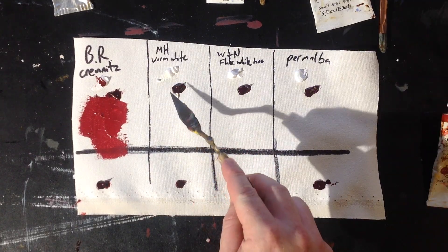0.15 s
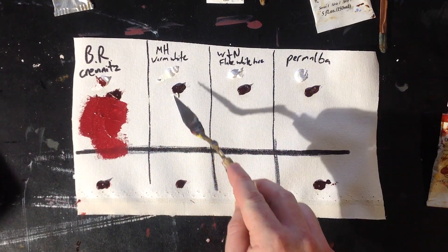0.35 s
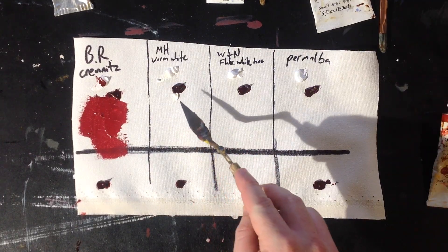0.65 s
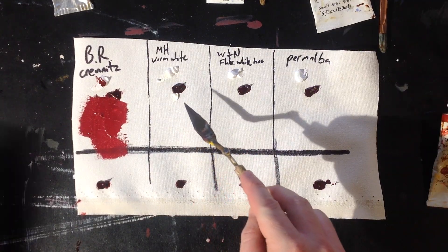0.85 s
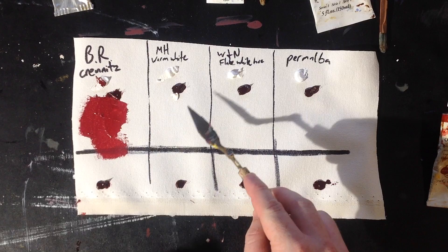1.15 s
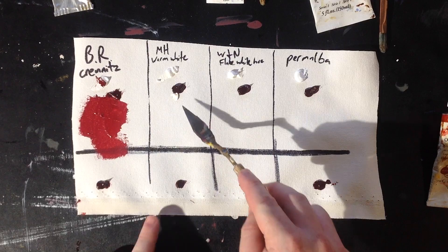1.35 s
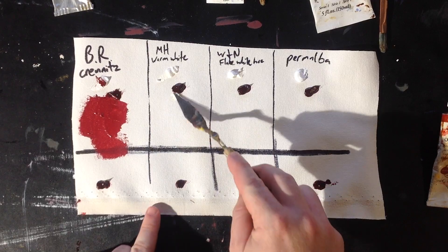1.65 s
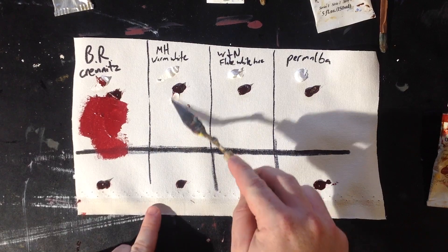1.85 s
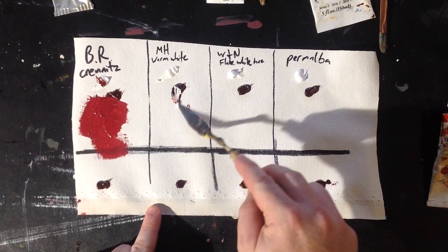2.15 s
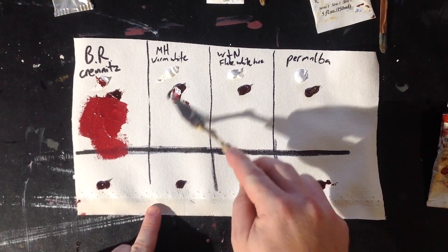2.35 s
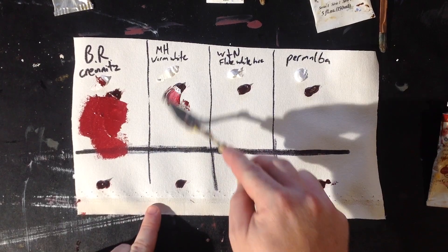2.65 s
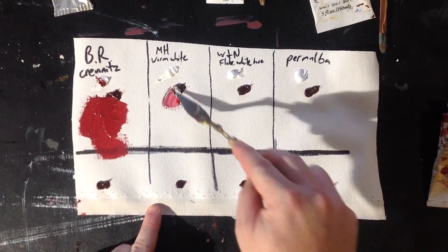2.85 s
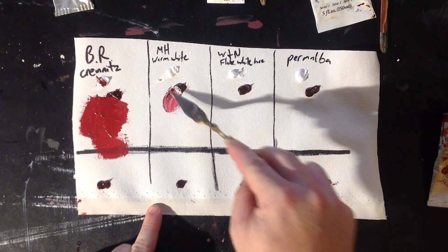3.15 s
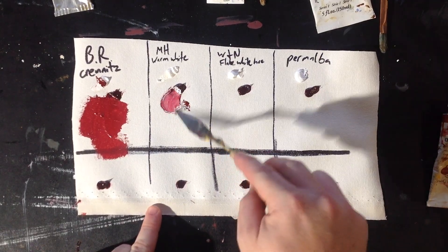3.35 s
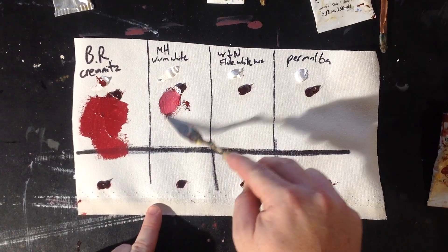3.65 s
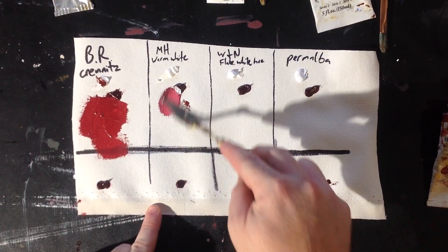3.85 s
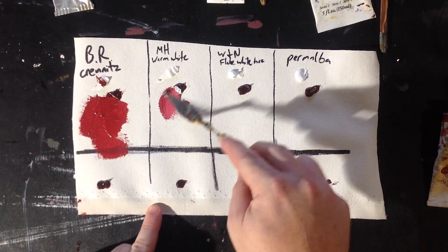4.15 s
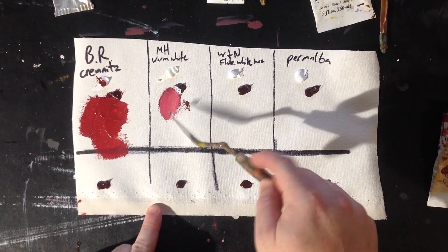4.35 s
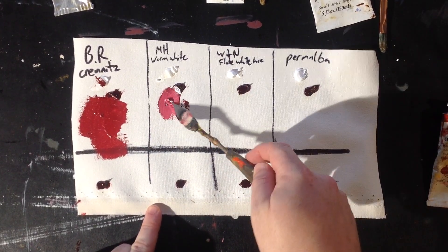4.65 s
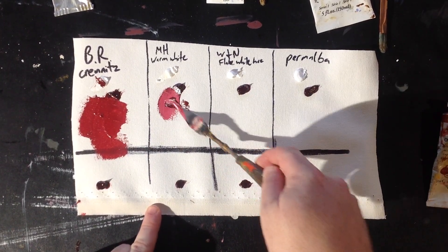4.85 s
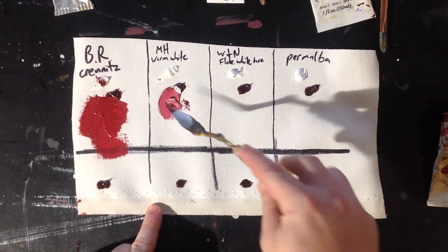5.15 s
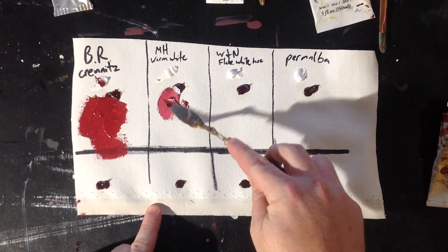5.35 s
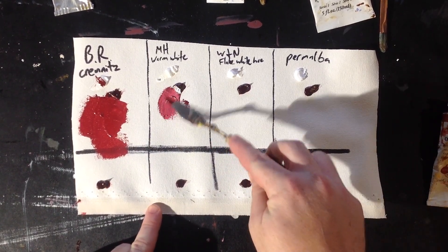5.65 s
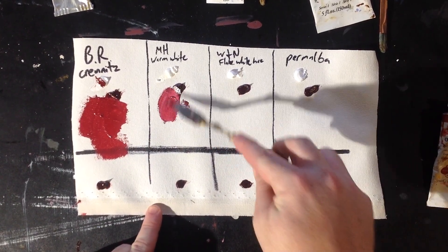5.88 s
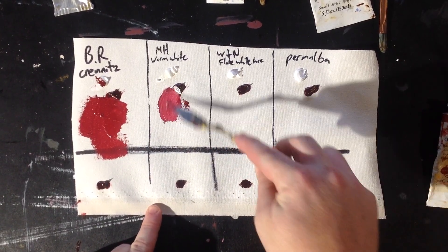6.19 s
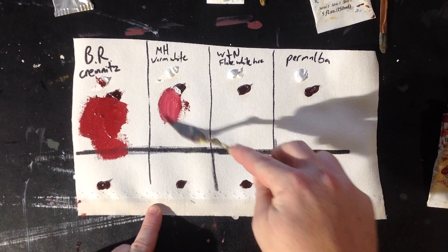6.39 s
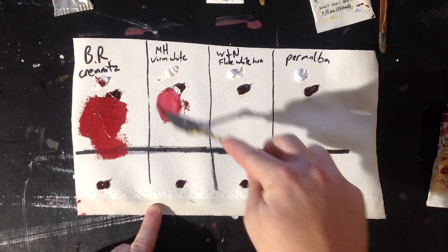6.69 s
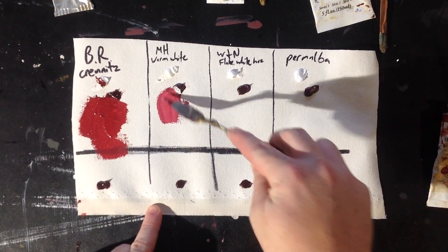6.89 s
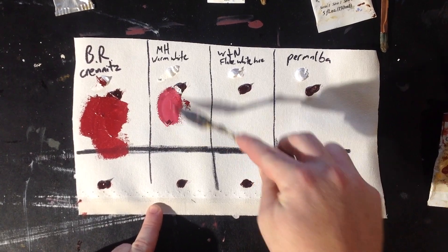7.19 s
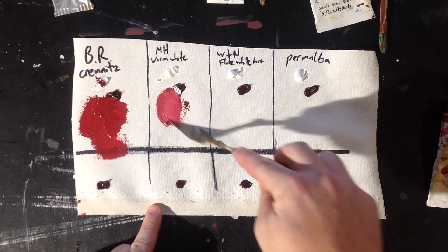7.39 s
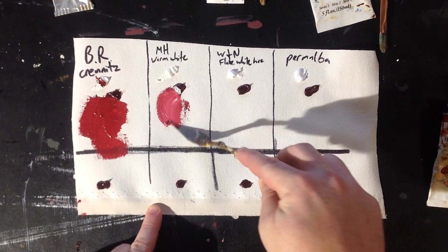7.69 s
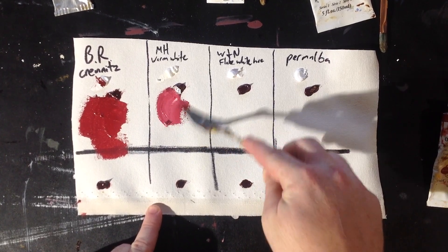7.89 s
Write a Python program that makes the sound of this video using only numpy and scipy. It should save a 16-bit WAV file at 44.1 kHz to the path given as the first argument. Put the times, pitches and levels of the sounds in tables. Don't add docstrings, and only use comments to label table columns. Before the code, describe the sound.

Close, dry scrapes and light ticks of a flexible metal blade rubbing paint into woven canvas, quickening, in a quiet room with low humming.

```python
import sys
import numpy as np
from scipy import signal
from scipy.io import wavfile
from scipy.ndimage import uniform_filter1d

SR = 44100
rng = np.random.default_rng(int(sys.argv[2]) if len(sys.argv) > 2 else 0)


def to_linear_factor(level_db):
    exponent = np.asarray(level_db, float) / 20
    return 10 ** exponent


def wrap_up_sound(samples):
    columns = np.atleast_2d(samples).T
    tamed = np.clip(columns, -1, 1)
    steps = np.round(tamed * 32767).astype(np.int16)
    wavfile.write(sys.argv[1], SR, steps)


N = 353902


def evened(x):
    return x / np.sqrt(np.mean(x ** 2) + 1e-20)


def read(points, hz):
    f, value = np.transpose(points)
    return np.interp(np.log(hz + 1), np.log(f + 1), value)


def track(rows):
    s, *columns = np.transpose(rows)
    return [np.interp(np.arange(N) / SR, s, c) for c in columns]


def add(mix, s, sound):
    part = mix[max(round(s * SR), 0):][:len(sound)]
    part += sound[:len(part)]


def drift(seconds):
    size = max(round(seconds * SR), 1)
    once = uniform_filter1d(rng.standard_normal(N), size)
    return evened(uniform_filter1d(once, size))


def resonate(x, hz, width):
    pole = np.exp((2j * np.pi * min(hz, SR / 2.2) - np.pi * width) / SR)
    gain, feedback = [1 - abs(pole)], [1, -pole]
    once = signal.lfilter(gain, feedback, x)
    return 2 * signal.lfilter(gain, feedback, once).real


def body(x, modes, sway_db=0):
    out = np.zeros(len(x))
    for k, (hz, width, db) in enumerate(modes):
        sway = sway_db * drift(0.011) if sway_db else 0
        ring = resonate(x, hz, width) / np.sqrt(width)
        out += (-1) ** k * to_linear_factor(db + sway) * ring
    return evened(out)


def tone(hz, rows, waver_hz, waver_db):
    turns = np.cumsum(hz + waver_hz * drift(0.04)) / SR
    level = to_linear_factor(track(rows)[0] + waver_db * drift(0.027))
    return np.sqrt(2) * level * np.sin(2 * np.pi * turns)


# (pitch [Hz], level [dB per Hz])
AIR_COLOUR = [(30, -32), (70, -21), (110, -3), (200, 3.5), (350, -0.5), (500, -6.5), (1050, -9.5),
              (1500, -15.5), (2300, -15.5), (3500, -17.5), (8000, -18), (12000, -19), (15300, -18.5)]


def air():
    frames, hz = N // 256 + 5, np.fft.rfftfreq(1024, 1 / SR)
    a, b, patches = rng.standard_normal((frames, 513, 3)).T
    patches = uniform_filter1d(patches, size=6, axis=0)
    patches = evened(uniform_filter1d(patches, size=40, axis=1))
    patchy_db = read([(300, 1.2), (1500, 1.5), (3000, .5)], hz)[:, None]
    z = (a + 1j * b) * to_linear_factor(read(AIR_COLOUR, hz)[:, None] + patchy_db * patches)
    noise = signal.istft(z, nperseg=1024, noverlap=768)[1][:N]
    return to_linear_factor(-61) * evened(noise)


# (pitch [Hz], width [Hz], level [dB])
FAN_NOTES = [(146.1, 4.6, -72.5), (204.4, 20, -66), (296.4, 22, -68), (349.5, 5.4, -74.5),
             (517.5, 9.5, -79), (978, 11, -91)]


def fan():
    out = np.zeros(N)
    for hz, width, db in FAN_NOTES:
        out += to_linear_factor(db) * evened(resonate(rng.standard_normal(N), hz, width))
    return out


# (time [s], level [dB])
HUM_LEVEL = [(0.0, -55), (0.78, -54.5), (3.24, -54), (3.33, -52), (3.51, -54.5), (4.69, -54.5), (4.85, -57),
             (4.93, -55), (6.36, -58), (6.45, -61), (7.48, -61), (7.57, -62), (8.02, -63)]


def hum():
    return tone(259.0, HUM_LEVEL, waver_hz=0.87, waver_db=1.09)


# (time [s], level [dB])
DRONE_LEVEL = [(0.2, -64), (1.36, -71), (1.62, -54.5), (2.01, -59), (2.93, -74.5), (3.21, -58),
               (3.93, -58.5), (4.35, -67.5), (4.55, -50), (4.85, -57), (5.1, -69.5), (6.43, -51.5),
               (6.79, -55.5), (6.99, -72), (7.17, -55), (7.43, -48), (7.64, -64.5), (8.02, -50.5)]
# (time [s], pitch [Hz])
DRONE_PITCH = [(0, 172), (1.45, 169), (1.9, 162), (2.7, 158), (3.1, 162), (4.2, 166), (4.5, 165),
               (4.9, 162), (5.5, 157), (6.1, 162), (6.8, 165), (7.1, 168), (7.5, 160), (8, 154)]


def drone():
    return tone(track(DRONE_PITCH)[0], DRONE_LEVEL, waver_hz=1.0, waver_db=2.3)


# (pitch [Hz], time to fade by 60 dB [s])
ROOM_FADE = [(500, 0.4), (1500, 0.073), (4000, 0.22), (12000, 0.15)]


def room(x):
    spikes = np.zeros(SR // 2)
    at = np.arange(200, SR // 2 - 20, 20)
    spikes[at + rng.integers(0, 20, len(at))] = rng.choice([-1., 1.], len(at))
    hz, t, z = signal.stft(spikes, SR, nperseg=256)
    fading = to_linear_factor(-60 * t / read(ROOM_FADE, hz)[:, None])
    tail = signal.istft(z * fading, SR, nperseg=256)[1]
    return signal.fftconvolve(x, tail / np.linalg.norm(tail))[:N]


# (time [s], level [dB])
SLEEVE_LEVEL = [(0, -70), (.45, -73.5), (1.15, -73.5), (1.35, -82), (1.85, -83), (1.878, -58), (1.9, -94),
                (2.3, -72), (3.0, -75.5), (4.6, -86), (4.85, -68.5), (5.4, -74.5), (5.7, -94), (7.4, -72),
                (7.6, -69), (7.8, -88)]


def sleeve():
    lumpy = rng.standard_normal(N) * to_linear_factor(2.5 * drift(0.0017))
    cloth = body(lumpy, [(1326, 240, 3.5), (1700, 560, -1.5)])
    return to_linear_factor(track(SLEEVE_LEVEL)[0]) * cloth


# (time [s], peak level [dB])
SNAP_TIMES = [(0.6415, -45), (2.4222, -42), (2.4516, -36), (2.4594, -36), (2.7104, -32), (2.7569, -36),
              (3.0295, -39), (3.3403, -43), (3.6309, -38), (3.9204, -33), (3.9384, -34), (3.9874, -39),
              (4.2834, -41), (4.6753, -43), (5.0181, -43), (5.4658, -35), (5.5237, -42), (5.7722, -28),
              (5.8129, -35), (6.744, -34), (6.7979, -38), (7.043, -40), (7.0477, -33), (7.0566, -34),
              (7.0809, -35), (7.3813, -39), (7.4275, -32), (7.6672, -34), (7.731, -31), (7.9542, -37)]
# (pitch [Hz], width [Hz], level [dB])
SNAP_RING = [(6400, 1800, -2), (8950, 4300, -3.5), (10600, 1900, 10.5), (13000, 2400, 8)]


def snaps():
    out, t = np.zeros(N), np.arange(400) / SR
    for s, peak_db in SNAP_TIMES:
        burst = rng.standard_normal(len(t)) * to_linear_factor(-60 * t / .004)
        crack = body(burst, SNAP_RING)
        add(out, s, to_linear_factor(peak_db) * crack / abs(crack).max())
    return out


# (time [s], peak level [dB], ring [Hz], overtone against ring [dB])
BLADE_TAPS = [(0.0094, -42, 1660, -6), (2.232, -39.5, 1680, -9), (2.412, -47, 1770, -19),
              (2.653, -47, 1340, -8), (2.9516, -46, 1800, -7), (3.2474, -37.5, 1870, -17),
              (3.285, -35.5, 1860, -14), (3.423, -46, 1830, 2), (3.5465, -36.5, 1720, -6.5),
              (3.5896, -37, 1790, -23), (3.8485, -36, 1790, -17), (4.191, -37.5, 1530, -11),
              (4.1996, -39.5, 1870, -25), (4.6664, -43.5, 1660, -13), (4.994, -52, 1800, -8),
              (5.0165, -31, 1780, -16), (5.4018, -44.5, 1610, -12), (5.696, -38.5, 1600, -13),
              (6.0076, -40, 1620, -22), (6.33, -37, 1620, -11), (6.651, -43, 1770, -11),
              (6.9887, -40.5, 1640, -22), (7.192, -40.5, 1770, -7), (7.3233, -41.5, 1630, -6),
              (7.625, -45, 1670, -5), (7.666, -28.5, 1740, -34)]
# (time [s], peak level [dB], ring [Hz], overtone against ring [dB])
HANDLE_TICKS = [
    (0.5004, -42.5, 2860, -25),
    (0.6408, -41.5, 2540, -11),
    (0.8707, -48, 4020, -15),
    (0.8766, -46, 2700, -6),
    (0.9552, -54, 2650, -10),
    (7.8733, -32.5, 1470, -8),
]
# (pitch [Hz], width [Hz], level [dB])
CANVAS_RING = [(1519, 250, -4), (1768, 360, -2.5), (2013, 580, -5.5), (2650, 960, -13)]
# (pitch [Hz], width [Hz], level [dB])
CLICK_RING = [(3300, 2000, 4.5), (5770, 3200, 3), (8500, 3000, 4), (11400, 3600, 1)]


def taps():
    out, t = np.zeros(N), np.arange(1500) / SR
    rows = [(*r, -12) for r in BLADE_TAPS] + [(*r, -5) for r in HANDLE_TICKS]
    for s, peak_db, hz, over_db, tick_db in rows:
        noise = rng.standard_normal(len(t))
        overtone = to_linear_factor(over_db + 6.5 - 60 * t / 0.0087) * np.cos(2 * np.pi * 1.91 * hz * t)
        ring = np.sin(2 * np.pi * hz * t) - overtone
        thud = ring * (1 - np.exp(-t / 0.00072)) * to_linear_factor(-60 * t / 0.0074)
        rustle = 0.21 * body(noise, CANVAS_RING) * to_linear_factor(-60 * t / 0.016)
        tick = body((t == 0) + .3 * noise * to_linear_factor(-60 * t / 0.005), CLICK_RING)
        tick = to_linear_factor(tick_db - 2.0) * tick / abs(tick).max()
        add(out, s + .0007, to_linear_factor(peak_db + 4.0) * (thud + rustle + tick))
    return out


def catches(per_s, spread_db, lumps, lump_db, smooth):
    sizes = to_linear_factor(spread_db * np.minimum(rng.exponential(1, N), 4))
    clicks = (rng.random(N) < per_s / SR) * sizes * rng.choice([-1., 1.], N)
    slide = evened(clicks) + smooth * rng.standard_normal(N)
    return slide * to_linear_factor(lump_db * lumps)


def contact(rows, shape):
    t, power = np.arange(N) / SR, np.zeros(N)
    creep_db, creep, lift, knee_db, trail = shape
    for start, length, db, swell_db, _ in rows:
        before, after = np.maximum(start - t, 0), np.maximum(t - start - length, 0)
        landing = np.maximum(1 - before / .017, to_linear_factor(creep_db - creep * before))
        held_db = db + swell_db * np.clip((t - start) / length, 0, 1)
        lifting_db = np.minimum(lift * after, knee_db + trail * after)
        power += (landing * to_linear_factor(held_db - lifting_db)) ** 2
    grips = [(start + length / 2, grip) for start, length, _, _, grip in rows]
    return np.sqrt(power), track(grips)[0]


# (start [s], length [s], level [dB], swell over the stroke [dB], pressure into the table [dB])
RUB_STROKES = [(0, 0.041, -62.5, 0.5, 2), (2.11, 0.107, -71.5, 5, 4), (2.418, 0.039, -60.5, 8, 0.5),
               (2.691, 0.056, -54.5, -0.5, 3.5), (2.802, 0.011, -60.5, 5.5, 0),
               (3.004, 0.035, -57.5, 1, -1), (3.268, 0.12, -61.5, -4, 2), (3.403, 0.081, -64, -0.5, -1),
               (3.589, 0.074, -55, 0.5, -1.0), (3.9, 0.085, -56.5, 2, -1.5), (4.051, 0.017, -61.5, -11, -2),
               (4.213, 0.089, -61, 7, -5.5), (4.684, 0.017, -59.5, -2, -11), (4.941, 0.082, -69.5, 15, 0),
               (5.458, 0.06, -56.5, 3.5, -4), (5.755, 0.066, -47.5, -8.5, 1), (6.053, 0.084, -51.5, 1.5, 1),
               (6.378, 0.072, -52.5, 5, 0), (6.678, 0.11, -58.5, 9.5, -1.5), (7.039, 0.078, -55, 3.5, -0.5),
               (7.352, 0.083, -55, 1, 0), (7.662, 0.076, -51, 2, -3), (7.89, 0.015, -50.5, -14, -6),
               (7.963, 0.053, -44.5, -1.5, -1)]
# (start [s], length [s], level [dB], swell over the
# stroke [dB], steepness of the edge [dB])
EDGE_SLIDES = [(0.01, 0.04, -66.5, -4, -25), (0.49, 0.077, -71, -3, -2), (2.152, 0.022, -67.5, 6, -5),
               (2.432, 0.023, -48, -3, -6.0), (2.692, 0.048, -53, 8.5, -5), (2.96, 0.083, -73, 20.5, 1),
               (3.257, 0.089, -73.5, 13.5, 7), (3.38, 0.076, -67.5, -2, -2), (3.563, 0.094, -68, 17, 1.5),
               (3.921, 0.06, -55.5, 2.5, 4), (4.22, 0.1, -66.5, 6.5, 3), (4.668, 0.003, -77, 8, 8),
               (4.749, 0.038, -77.5, 10, -3.0), (4.95, 0.075, -78, 17.5, 3.0), (5.459, 0.06, -52.5, -4, -5),
               (5.753, 0.057, -42, -8.5, -6), (6.054, 0.067, -46.5, 1, -4), (6.377, 0.068, -51.5, 6, 0),
               (6.741, 0.049, -50, 0.5, -2), (7.051, 0.086, -52.5, 1, 0.5), (7.364, 0.079, -60.5, 7, 5.5),
               (7.66, 0.063, -56.5, 12.5, 2), (7.963, 0.04, -48.5, 3, 3.5),
               (6.665, .06, -69.5, 6, 0),
    (7.88, 0.071, -72, 0, -6),
    (2.6, 0.075, -79, 0, -5),
]
# (creep [dB], creep rise [dB per s], lift [dB per s], knee [dB], trail [dB per s])
RUB_COMING_GOING = (-12, 250, 900, 6, 162)
SLIDE_COMING_GOING = (-18, 304, 568, 8.5, 213)
# (time [s], level [dB])
LOOSE_GRIP = [(.03, 5), (.52, 7), (2.44, 0), (2.72, 2), (3.03, -1), (3.43, 3), (3.63, -0.5), (3.95, -0.5),
              (4.28, -2.5), (4.9, 6.5), (5.48, 2.5), (5.78, 0), (6.09, 0.5), (6.42, 0.5), (6.76, 2),
              (7.09, 1), (7.55, -2), (7.97, 3)]
# (pitch [Hz], width [Hz], level [dB])
TABLE_RING = [(356, 49, -2.5), (613, 360, -2), (956, 163, -3.5), (1197, 235, 2)]
BLADE_RING = [(3000, 2000, 0.5), (4390, 660, 2.5), (5320, 1000, 0), (6520, 1530, 1)]
EDGE_RING = [(8760, 2700, 0.95), (10680, 2550, 5.9)]
STEEP_EDGE_RING = [(13230, 5000, 32), (15450, 830, 20)]


def scrape():
    lumps = drift(0.0025)
    coarse = catches(1600, 3.0, lumps, 2.4, .7)
    fine = catches(4000, 4.0, lumps, 2.2, .8)
    rubbing, press_db = contact(RUB_STROKES, RUB_COMING_GOING)
    sliding, steep_db = contact(sorted(EDGE_SLIDES), SLIDE_COMING_GOING)
    rub = body(coarse, CANVAS_RING, 1.7) + to_linear_factor(press_db - 6.5) * body(coarse, TABLE_RING, 2.8)
    hiss = body(fine, EDGE_RING, 1.6) + to_linear_factor(steep_db - 2.5) * body(fine, STEEP_EDGE_RING, 1.8)
    chatter = to_linear_factor(track(LOOSE_GRIP)[0]) * np.hypot(to_linear_factor(-10.5) * rubbing, to_linear_factor(-7.5) * sliding)
    return rubbing * rub + chatter * body(fine, BLADE_RING, 2.0) + sliding * hiss


def scene():
    background = air() + fan() + hum() + drone()
    knife = sleeve() + snaps() + taps() + scrape()
    return (knife + to_linear_factor(-7) * room(knife) + background)[None]


def roll_off(x):
    return signal.sosfilt(signal.butter(12, 15500, fs=SR, output="sos"), x)


def record(dry):
    lowpass = signal.firwin(511, 15330, window=("kaiser", 9), fs=SR)
    limited = signal.oaconvolve(dry, lowpass[None], "same")
    return roll_off(limited)


dry = scene()
out = record(dry)
wrap_up_sound(out)
```